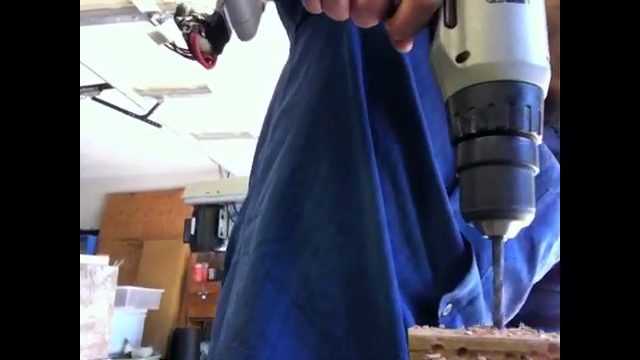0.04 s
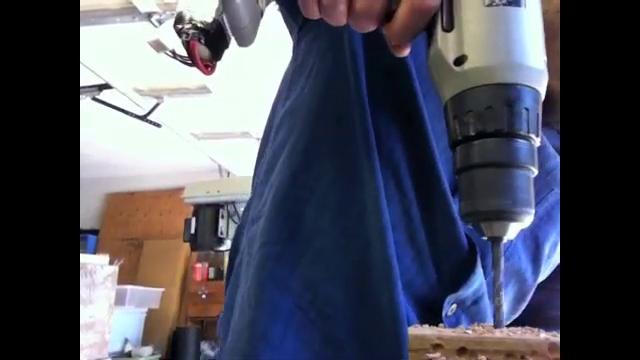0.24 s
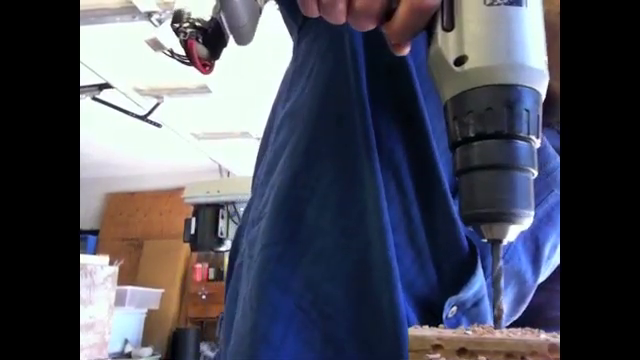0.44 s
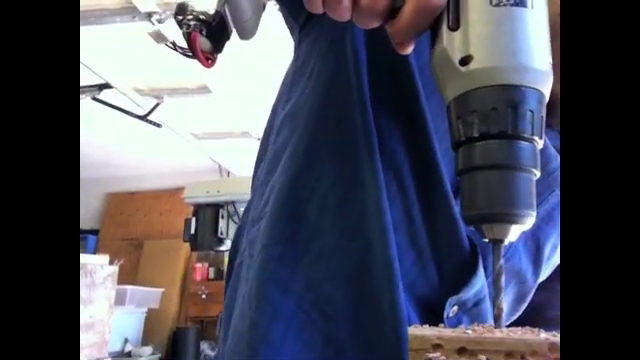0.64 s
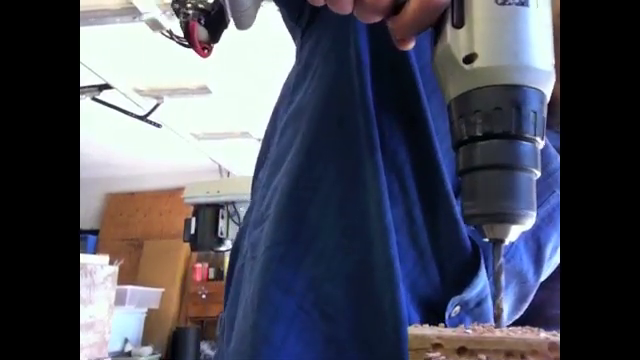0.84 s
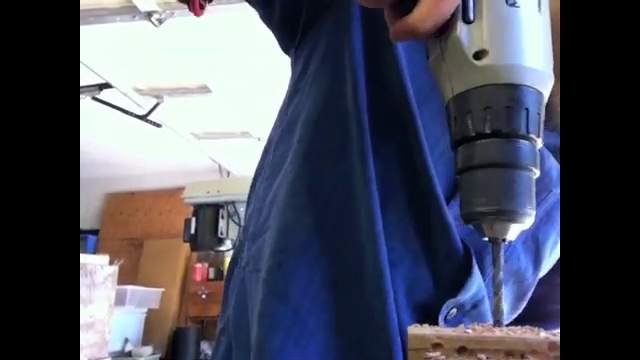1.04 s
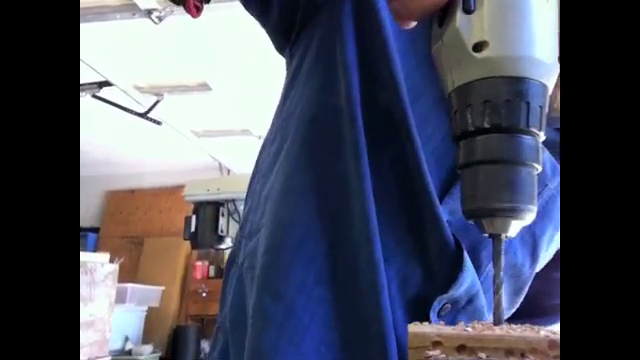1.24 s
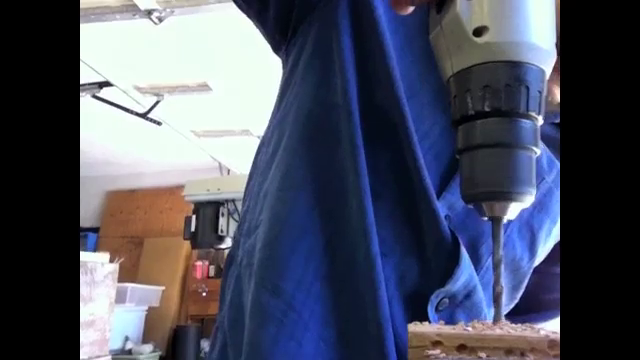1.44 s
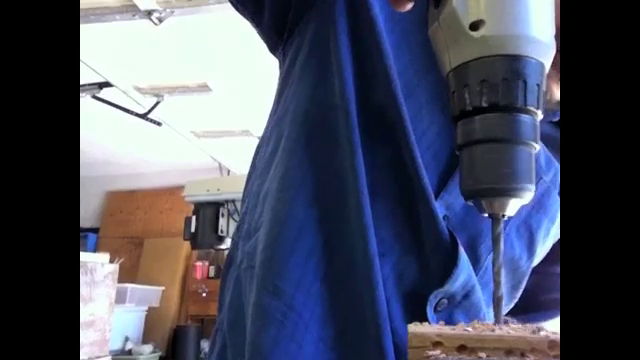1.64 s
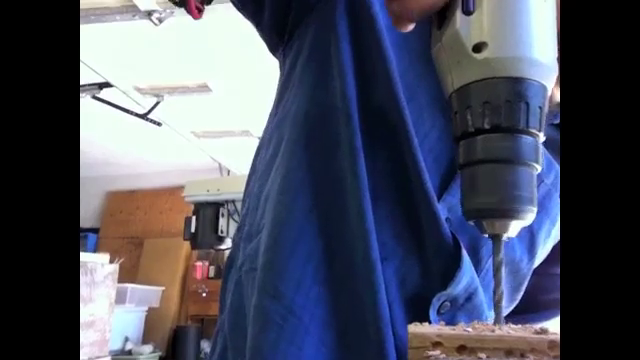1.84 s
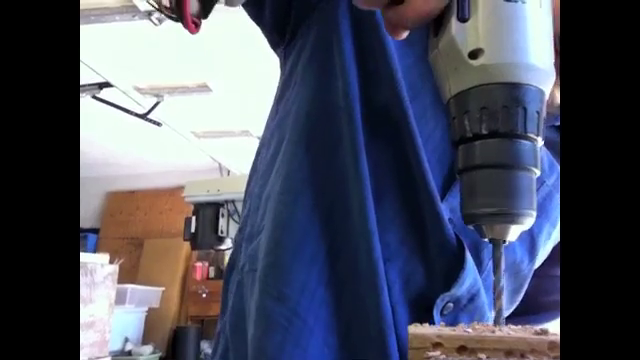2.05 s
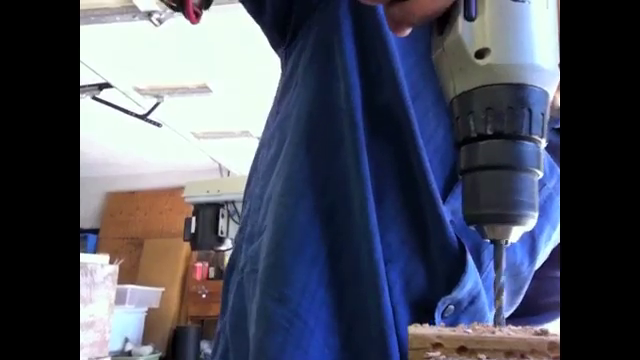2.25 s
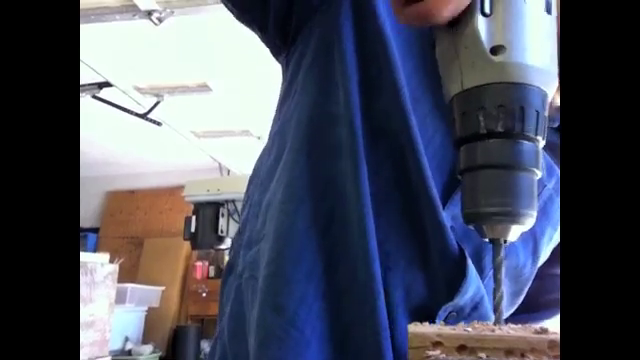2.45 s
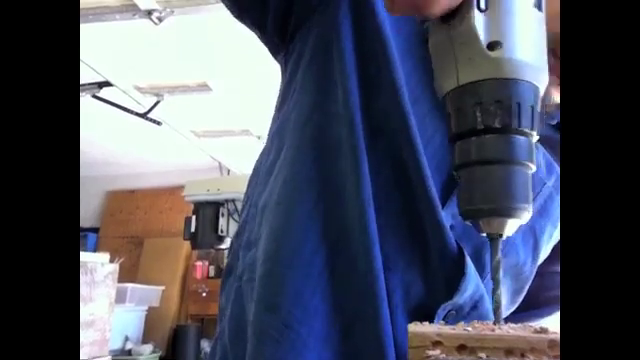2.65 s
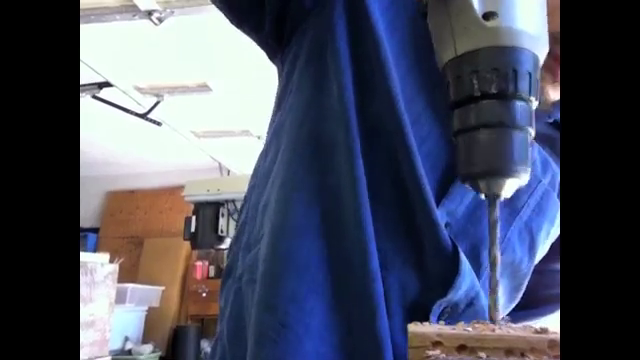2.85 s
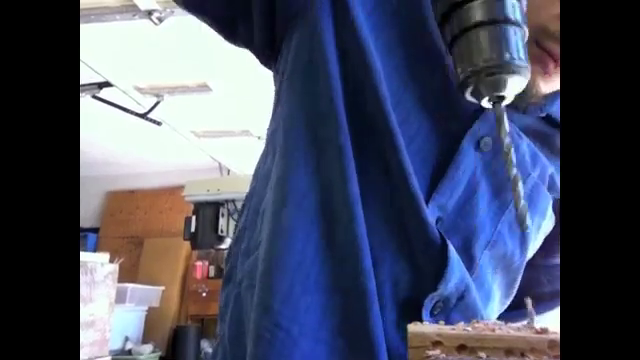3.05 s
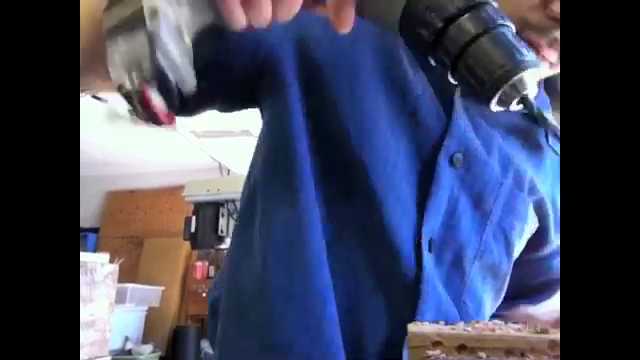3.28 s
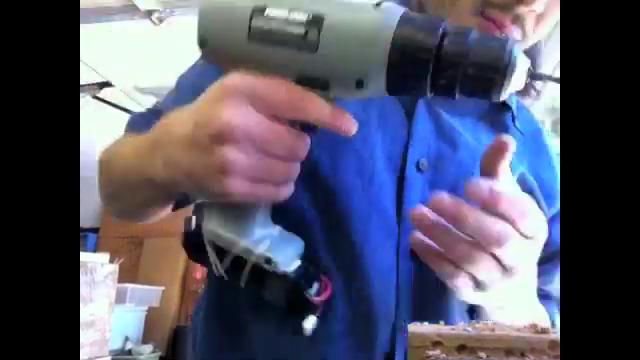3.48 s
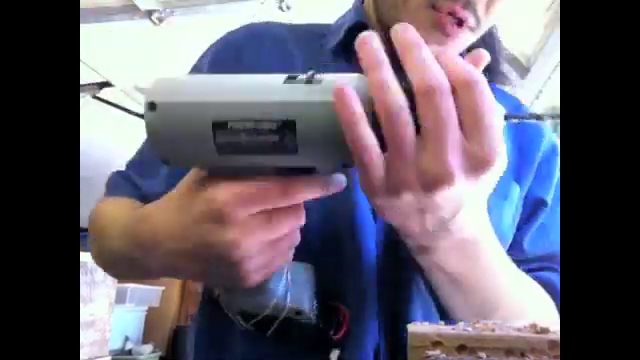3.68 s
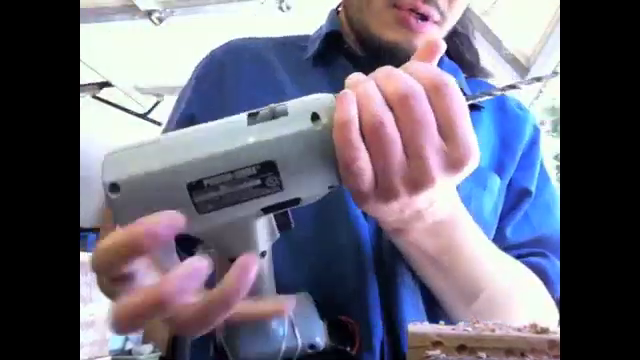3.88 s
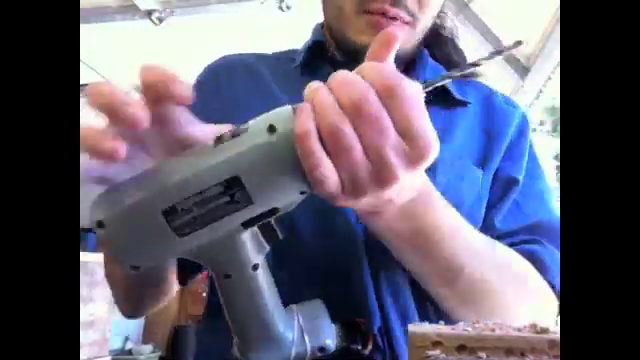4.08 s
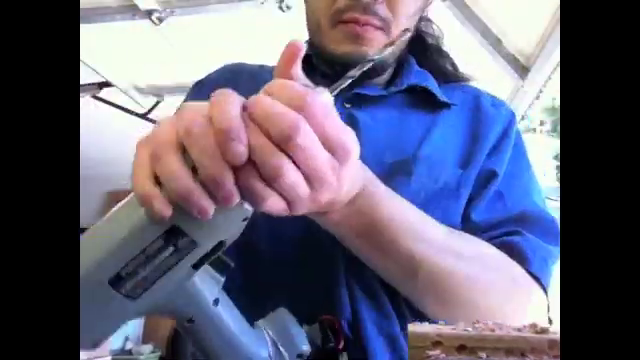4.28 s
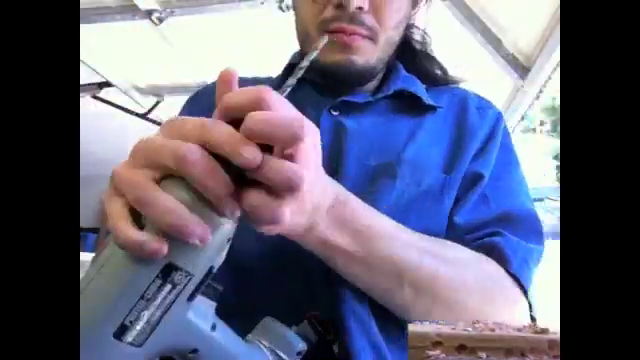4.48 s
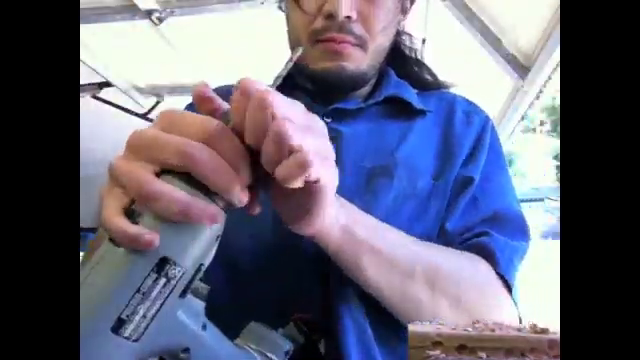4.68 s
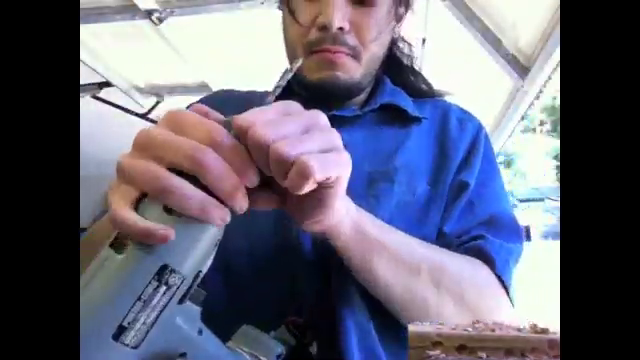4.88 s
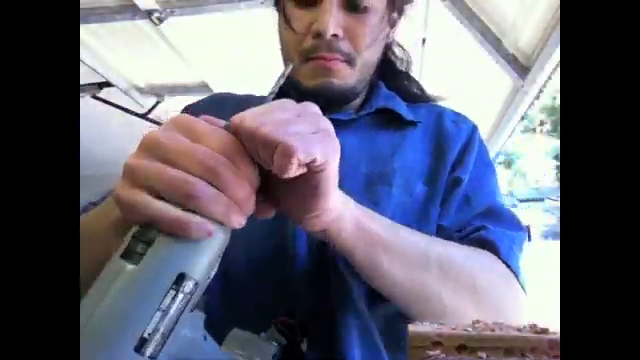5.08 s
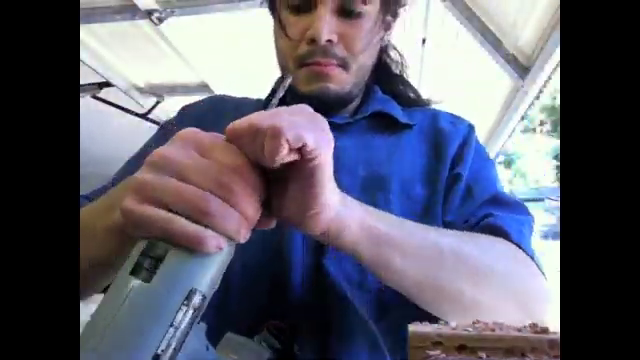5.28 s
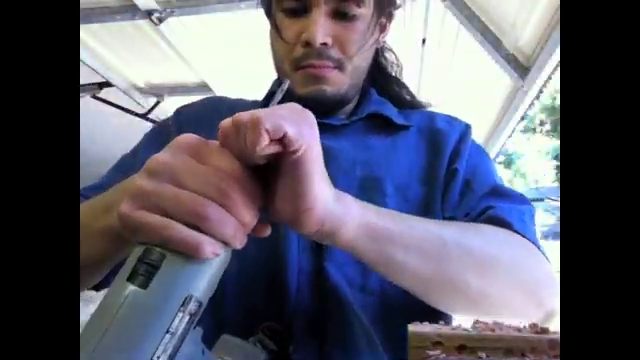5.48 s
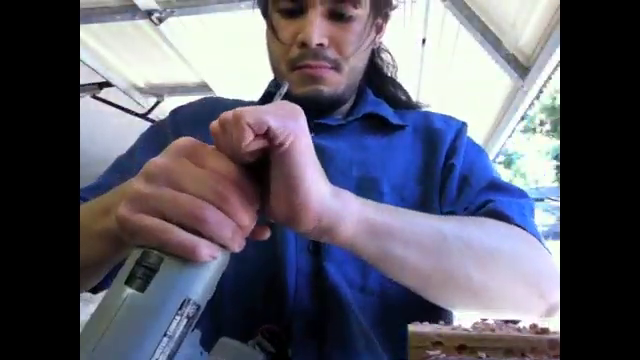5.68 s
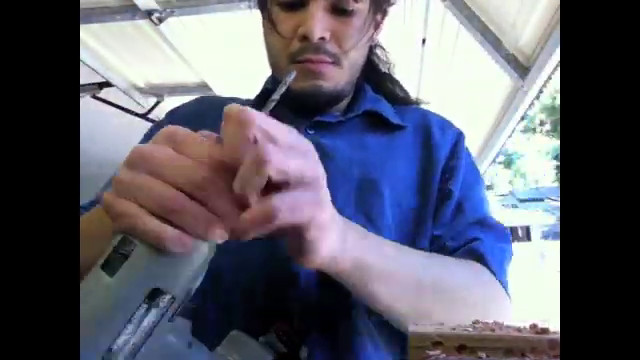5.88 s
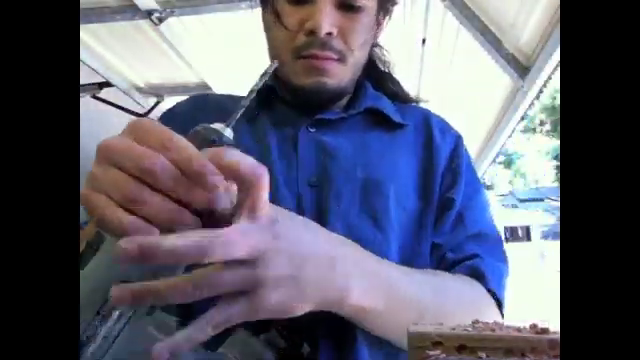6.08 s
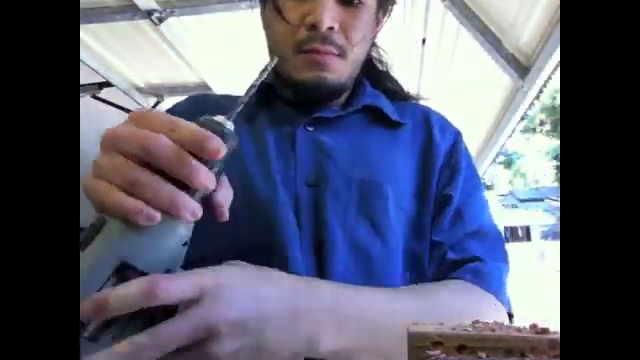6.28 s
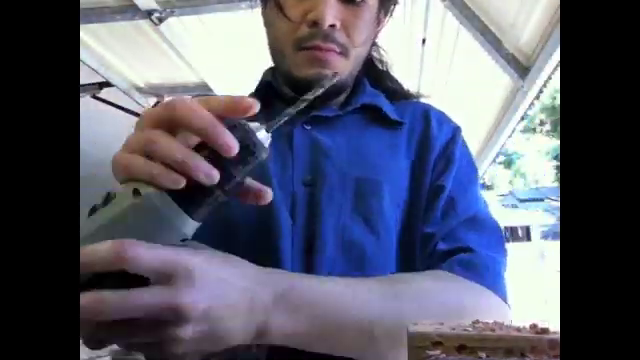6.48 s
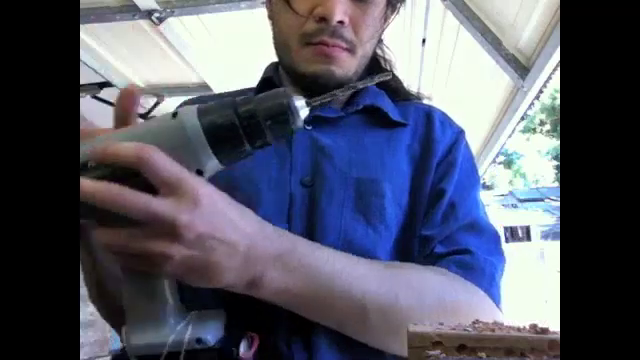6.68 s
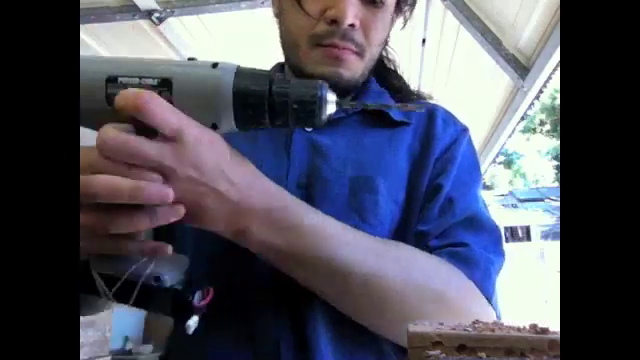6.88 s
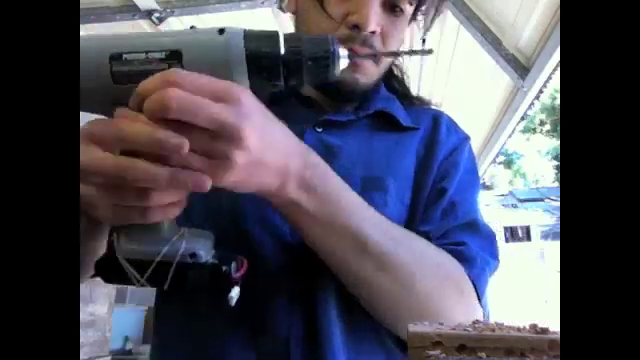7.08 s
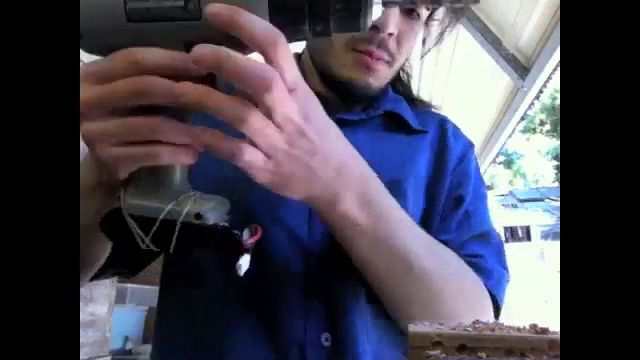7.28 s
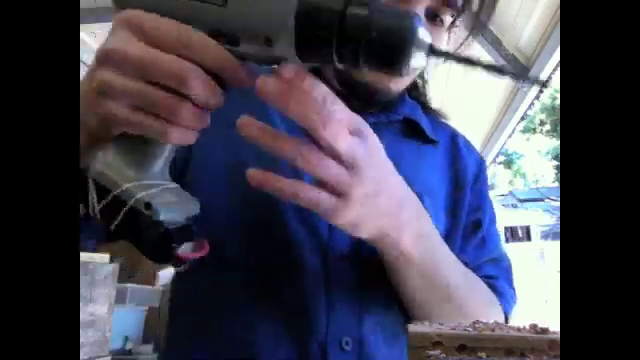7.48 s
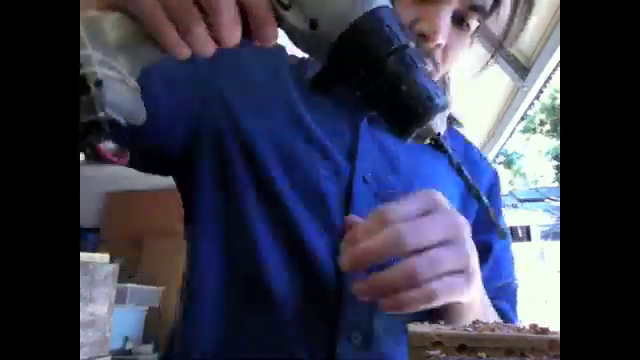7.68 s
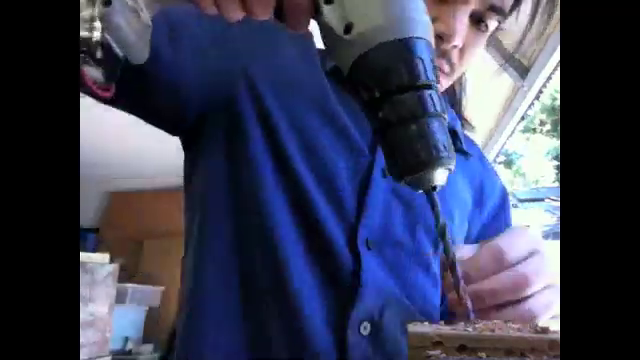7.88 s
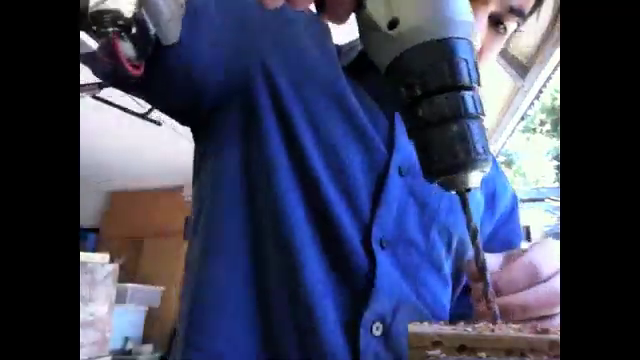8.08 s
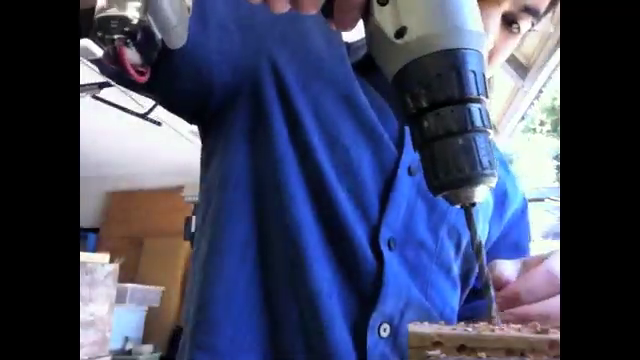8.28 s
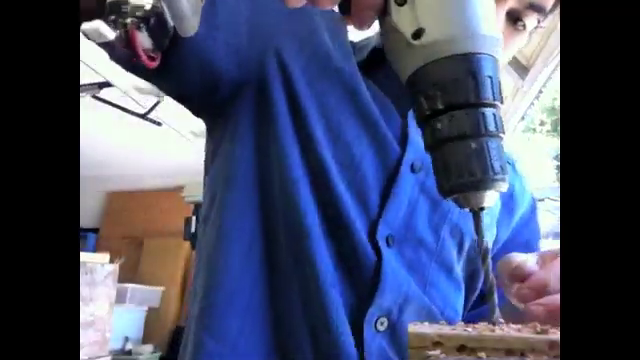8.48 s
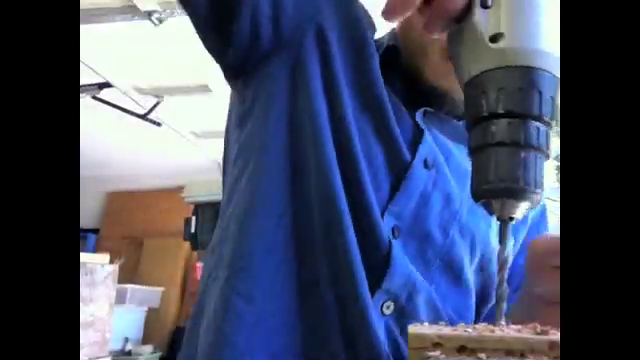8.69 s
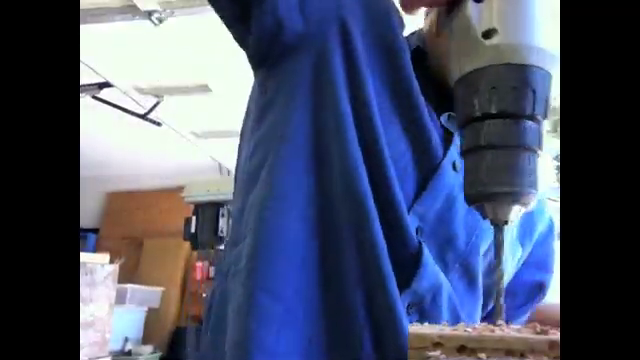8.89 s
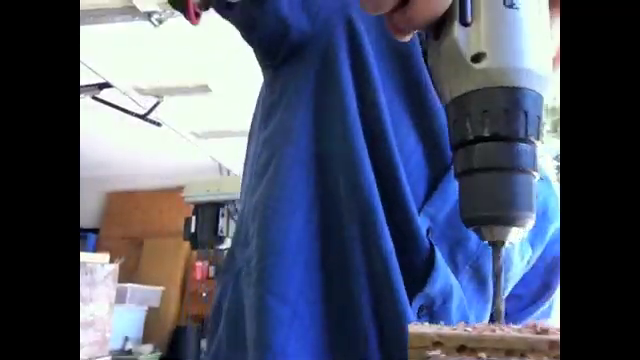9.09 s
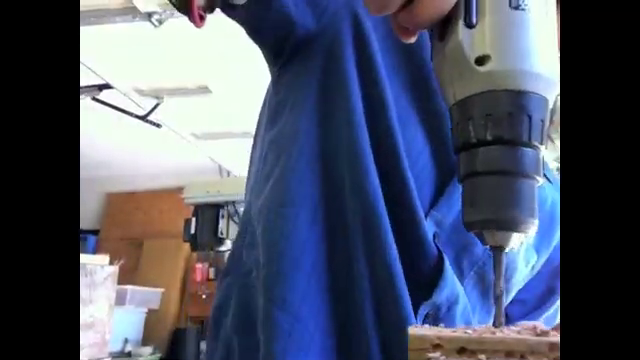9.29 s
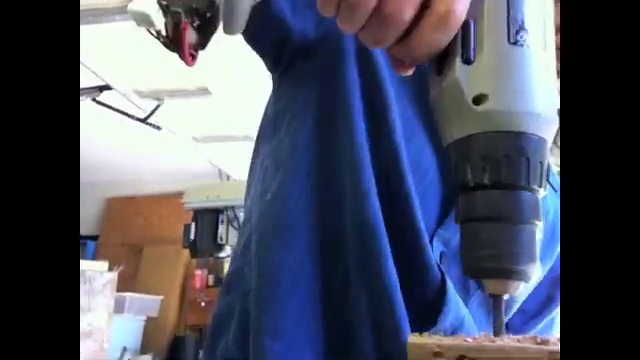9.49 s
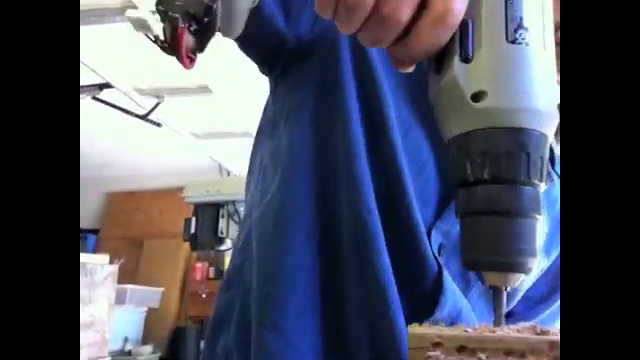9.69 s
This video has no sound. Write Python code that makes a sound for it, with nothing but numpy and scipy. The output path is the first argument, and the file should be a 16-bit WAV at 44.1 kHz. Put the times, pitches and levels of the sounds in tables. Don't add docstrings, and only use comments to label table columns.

```python
import sys
import numpy as np
from scipy import signal
from scipy.fft import rfft, irfft, next_fast_len
from scipy.io import wavfile
from scipy.ndimage import uniform_filter1d

SR = 44100
rng = np.random.default_rng(int(sys.argv[2]) if len(sys.argv) > 2 else 0)


def to_linear_factor(level_db):
    exponent = np.asarray(level_db, float) / 20
    return 10 ** exponent


def master_out(mix):
    frames = np.transpose(np.atleast_2d(mix))
    ceiling = np.clip(frames, -1, 1)
    pcm = np.round(ceiling * 32767).astype(np.int16)
    wavfile.write(sys.argv[1], SR, pcm)


N = 429534
T = np.arange(N) / SR
FULL_SPEED = 178.8
# time_s, speed_turns_per_s, rattle_db
RUNS = [
    [(0, 180.5, -29.5), (.06, 180, -28), (.15, 179, -27.8), (1.01, 178.6, -28.2), (1.058, 151, -32),
     (1.095, 133, -34.5), (1.16, 108, -39.5), (1.22, 85, -44), (1.32, 47, -44)],
    [(1.38, 150, -32.5), (1.43, 177, -32), (1.53, 186, -33), (1.72, 191, -35.5), (1.82, 194, -33),
     (2.0, 187, -31.5), (2.1, 186, -30), (2.22, 177.6, -29.5), (2.47, 177, -30.5)],
    [(2.54, 150, -30), (2.62, 125, -40.5), (2.78, 96, -41), (2.84, 85, -45.5), (3.34, 21, -61.5),
     (3.45, 4.7, -74), (3.65, 5, -110)],
    [(8.962, 5.1, -110), (8.972, 12, -41.5), (8.998, 45.5, -37.5), (9.05, 126, -35), (9.15, 167, -30.5),
     (9.25, 183, -30), (9.32, 187.5, -31), (9.44, 184, -29), (9.57, 177, -33.5), (9.69, 187, -36)],
]
# frequency_hz, density_db per Hz
RATTLE_COLOUR = [(88, -48.5), (150, -17.5), (308, -17.5), (492, -8.5), (990, -8.5), (1380, -3),
                 (1580, -1.5), (2420, 4), (3510, 0), (4880, -5), (6540, -5.5), (7640, -10.5), (15700, -31)]
# frequency_hz, width_hz, level_db
SHELL_MODES = [(1370, 55, -3.5), (2336, 260, -4), (3073, 94, 1.5), (4560, 470, 0.5), (6000, 280, 5),
               (7500, 730, -6)]


def rms_one(x):
    return x / np.sqrt(np.mean(x ** 2) + 1e-20)


def in_time(rows):
    s, *columns = np.transpose(rows)
    return [np.interp(T, s, c) for c in columns]


def drift(rate_hz, where=slice(None)):
    r = np.exp(-64 * np.pi * rate_hz / SR)
    slow = signal.lfilter([1], [1, -2 * r, r * r], rng.standard_normal(N // 32 + 2002))[2000:]
    return np.interp(np.arange(N)[where] / 32, np.arange(len(slow)), rms_one(slow))


def colour(x, points):
    hz, db = np.transpose(points)
    size = next_fast_len(N)
    log_hz = np.log(np.fft.rfftfreq(size, 1 / SR) + 1)
    gain = to_linear_factor(np.interp(log_hz, np.log(hz), db))
    return rms_one(irfft(rfft(x, size) * gain, size)[:N])


def resonate(x, hz, width_hz):
    r = np.exp(-np.pi * width_hz / SR)
    poles = [1, -2 * r * np.cos(2 * np.pi * hz / SR), r * r]
    return signal.lfilter([(1 - r * r) / 2, 0, (r * r - 1) / 2], poles, x)


def cut(x, hz, kind):
    return signal.sosfilt(signal.butter(3, hz, kind, fs=SR, output="sos"), x)


def held(rows, rise, fall):
    levels = [db - rise * np.maximum(s - T, 0) - fall * np.maximum(T - s - hold, 0) for s, hold, db in rows]
    return np.max(levels, axis=0)


def add(out, s, db, wave):
    i = int(s * SR)
    out[i:i + len(wave)] += (to_linear_factor(db) * wave / np.abs(wave).max())[:N - i]
    return out


def dying(noise, t60, rise=0.002):
    t = np.arange(len(noise)) / SR
    return noise * np.minimum(t / rise, 1) * to_linear_factor(-60 * t / t60)


def bursts(rows, clean, flutter_hz):
    out = np.zeros(N)
    flutter = clean + rms_one(cut(rng.standard_normal(N), flutter_hz, "low"))
    for s, hz, db, length in rows:
        near = slice(int((s - .25) * SR), int((s + .25) * SR))
        t = T[near] - s
        out[near] += to_linear_factor(db) * np.exp(-(t / length) ** 2) * np.sin(2 * np.pi * hz * t)
    return out * flutter / np.sqrt(1 + clean ** 2)


def struck(hits, modes, rough):
    out, t = np.zeros(N), np.arange(5000) / SR
    for (s, db), own in zip(hits, rng.standard_normal((len(hits), len(modes), 40))):
        wave = np.zeros(len(t))
        for (hz, mode_db, t60), k in zip(modes, own):
            rattling = rough * np.interp(t, np.arange(38) * .002, k[2:])
            level = to_linear_factor(mode_db + 1.5 * k[0] - 60 * t / t60)
            wave += level * np.sin(2 * np.pi * hz * t + 3 * k[1] + rattling)
        add(out, s - .0003, db, wave * np.minimum(t / .0006, 1))
    return cut(out, 700, "high")


def clicks(rows):
    # frequency_hz, width_hz, level_db
    plastic_modes = [(1770, 890, -4), (2410, 1600, -16.5), (4000, 1700, -12.5), (6120, 590, -15.5)]
    out = np.zeros(N)
    for (s, db, hz, t60, bright_db), noise in zip(rows, rng.standard_normal((len(rows), 6000))):
        crack = dying(noise, t60, rise=.0012)
        shell = sum(to_linear_factor(mode_db) * resonate(crack, f, width) for f, width, mode_db in plastic_modes)
        tick = to_linear_factor(bright_db + 2.5) * cut(crack, 9000, "high")
        add(out, s - .0003, db, tick + cut(2.07 * shell + 1.7 * resonate(crack, hz, 450), 6440, "low"))
    return out


def housing(x):
    return x + sum(to_linear_factor(db) * resonate(x, hz, width) for hz, width, db in SHELL_MODES)


def gear_lines(lines, turns, blur, waver):
    out = np.zeros(N)
    on = np.gradient(turns) > 10 / SR
    for hz, db in lines:
        rate_hz = 8 + blur * hz
        phase = 2 * np.pi * hz / FULL_SPEED * turns[on] + waver * drift(rate_hz, on) + rng.uniform(0, 2 * np.pi)
        out[on] += to_linear_factor(db + 3 + 1.8 * drift(3 * rate_hz, on)) * np.sin(phase)
    return out


def trigger():
    # on_s, off_s, drone_db re rattle, nose_db re rattle
    presses = [
        (-1, 1.03, -11.5, -4.5),
        (1.33, 2.496, -11, -2.5),
        (8.9, 11, -9, 0),
    ]
    slack_s = .1
    on, off, low_db, nose_db = np.transpose(presses)
    run = np.searchsorted(on, T) - 1
    power = uniform_filter1d((T < off[run] + slack_s / 2) * 1., size=int(slack_s * SR))
    low_db = low_db[run] + 8.5 * (1 - power)
    nose_db = nose_db[run] + 4 * (1 - power)
    return power, low_db, nose_db, run > 0, T > on[-1]


def tooth_load(speed, power):
    skip_db = .14 * uniform_filter1d(np.abs(np.gradient(speed)) * SR, size=2000)
    loaded_db = np.maximum(-1.1 * np.abs(speed - FULL_SPEED) - skip_db, -14)
    return skip_db, loaded_db * power - 20.5 * (1 - power)


def tooth_hits(hits, turns, power):
    planets = 1 + 0.063 * np.cos(2 * np.pi * turns / 3) + 0.023 * np.cos(2 * np.pi * turns * 2 / 9)
    rounds = (turns * 55.6 / FULL_SPEED + .0015 * drift(8)) % 1
    worn = hits[:800][(rounds * 800).astype(int)] * .45 * power
    return (hits + worn) * planets * to_linear_factor(1.0 * drift(25))


def drone(rattle, speed, power, low_db, skip_db, load_db, regripped):
    gaining = uniform_filter1d((np.gradient(speed) > 0) * 1., size=2000)
    lag_db = .08 * np.minimum(skip_db, 18) * gaining
    low = rms_one(cut(rattle, 1500, "low")) * to_linear_factor(low_db + 2.0 + power * (0.17 * load_db - lag_db))
    palm = 0.6 * regripped * power * np.clip(load_db / -14, 0, 1)
    return low - palm * resonate(low, 1010, 170)


def nose_ring(teeth, nose_db, power):
    # frequency_hz, width_hz, level_db
    nose_modes = [(3780, 268.5, 4.5), (4150, 340, -9), (3740, 54, 2.5)]
    # frequency_hz, width_hz, level_db re rattle
    slack_modes = [(754, 39, -19.5), (1410, 60, -12), (1770, 36, -17), (2375, 70, -16), (4500, 67, -19.5),
                   (2960, 900, -12)]
    nose = rms_one(sum(to_linear_factor(db) * resonate(teeth, hz, width) for hz, width, db in nose_modes))
    nose = nose * to_linear_factor(2 * (nose_db + 5.5) - 17.5)
    slack = sum(to_linear_factor(db) * rms_one(resonate(teeth, hz, width)) for hz, width, db in slack_modes)
    return nose + (1 - power) * slack


def fan_and_brushes(hits, turns, rattle_db, power):
    fan_db = -19.5 + 0.096 * np.clip(-30.5 - rattle_db, 0, 30) * (1 - power)
    shaft = 1 + 0.11 * np.cos(2 * np.pi * turns)
    fan = cut(colour(hits[::-1] * shaft, RATTLE_COLOUR), 7350, "high") * to_linear_factor(fan_db + 25.0)
    brush = rms_one(cut(hits, [10000, 14000], "band")) * (1 - power)
    return fan + brush * to_linear_factor(-35 + .95 * np.clip(-28.5 - rattle_db, 0, 24))


def gear_mesh(turns, speed, load_db, regripped, in_wood):
    # frequency_hz at full speed, level_db
    chuck_lines = [(560, -61), (1340, -52)]
    # frequency_hz at full speed, level_db
    mesh_lines = [(382, -64), (500.6, -56.5), (608, -59), (775, -58), (893.6, -56), (996, -63),
                  (1109, -51.5), (1170, -57), (1443, -51.5), (1776, -53), (1949, -53), (2294, -54),
                  (2324, -56), (2443, -50), (2503, -46.5), (2692, -54), (2821, -55), (3338, -55),
                  (3978, -56), (4280, -58), (4404, -52), (4838, -46.5), (5010, -52), (5184, -54),
                  (5378, -57), (5550, -58), (5981, -55), (6648, -59), (7537, -54), (7581, -48), (7714, -53)]
    # low_hz, high_hz, beats_per_turn, depth (0-1)
    throb_bands = [(0, 2000, .195, .35), (2000, 3000, 1 / 3, .4), (3000, 9000, 1, .3)]
    # frequency_hz, width_hz, share added
    grip_changes = [(1380, 200, .7), (2460, 260, -.85), (4960, 80, .8)]
    slow = gear_lines(chuck_lines, turns, blur=.002, waver=.7)
    slow = slow * (speed / FULL_SPEED) ** 6 * to_linear_factor(-.08 * load_db)
    mesh = np.zeros(N)
    for low_hz, high_hz, beats, depth in throb_bands:
        band = [line for line in mesh_lines if low_hz < line[0] < high_hz]
        throb = 1 + depth * np.cos(2 * np.pi * beats * turns)
        mesh += gear_lines(band, turns, blur=.003, waver=1.1) * throb
    mesh = mesh * to_linear_factor(load_db - 6 * in_wood)
    mesh = mesh + regripped * sum(share * resonate(mesh, hz, width) for hz, width, share in grip_changes)
    return (slow + mesh) * to_linear_factor(33)


def loose_gears(turns):
    # frequency_hz at full speed, level_db
    pinion_lines = [(4790, -6), (4500, -7)]
    # start_s, hold_s, level_db
    flank_changes = [
        (1.035, 0.029, -33),
        (2.2, 0.26, -42),
        (2.47, 0.064, -37),
        (9.05, .12, -45),
    ]
    # frequency_hz at full speed, level_db
    loose_lines = [(1672, -4), (2234, 0)]
    # start_s, hold_s, level_db
    sing_times = [
        (-.1, 1.09, -51),
        (1.41, .14, -43.5),
        (1.6, .4, -58),
        (2.03, .27, -47),
        (9.08, .2, -51),
        (9.26, .19, -41.5),
        (9.5, .3, -46),
    ]
    # frequency_hz at full speed, level_db
    growl_lines = [(893.6, -7), (1170, -9), (1425, 0)]
    # start_s, hold_s, level_db
    growl_times = [
        (1.39, 0.12, -49),
        (9.07, 0.22, -51),
    ]
    coast = to_linear_factor(held(flank_changes, 710, 510)) * gear_lines(pinion_lines, turns, blur=0.014, waver=1.5)
    coast = coast + 1.3 * resonate(coast, 4050, 500)
    sing = to_linear_factor(held(sing_times, 300, 260)) * gear_lines(loose_lines, turns, blur=0.006, waver=1.3)
    growl = to_linear_factor(held(growl_times, 300, 100)) * gear_lines(growl_lines, turns, blur=.003, waver=.8)
    return coast + sing + growl


def drill():
    # start_s, hold_s, dulled_share_db
    stall_times = [
        (1.265, .068, -1.5),
    ]
    speed, rattle_db = in_time(sum(RUNS, []))
    turns = np.cumsum(speed) / SR
    power, low_db, nose_db, regripped, in_wood = trigger()
    skip_db, load_db = tooth_load(speed, power)
    hits = rng.standard_normal(N) * to_linear_factor(2.18 * np.minimum(rng.exponential(1, N), 6))
    teeth = tooth_hits(hits, turns, power)
    rattle = housing(colour(teeth, RATTLE_COLOUR))
    body = drone(rattle, speed, power, low_db, skip_db, load_db, regripped)
    body = body + rms_one(cut(rattle, [1500, 6500], "band")) * to_linear_factor(-5.5)
    body = body + nose_ring(teeth, nose_db, power)
    body = body + fan_and_brushes(hits, turns, rattle_db, power)
    body = body + gear_mesh(turns, speed, load_db, regripped, in_wood)
    body = body - to_linear_factor(held(stall_times, 400, 600)) * resonate(body, 8190, 8000)
    return cut(to_linear_factor(rattle_db) * body + loose_gears(turns), 40, "high")


def air():
    # frequency_hz, density_db per Hz
    air_colour = [(74, -28), (125, -3.5), (220, -7.5), (275, -11), (373, -13), (404, -6.5), (515, -10),
                  (558, -6.5), (683, -11.5), (871, -9.5), (1070, -18), (2250, -27), (3050, -33),
                  (6710, -35), (15700, -38)]
    level = to_linear_factor(-63 + .6 * drift(1.7))
    return cut(level * colour(rng.standard_normal(N), air_colour), 95, "high")


def rumble():
    # start_s, hold_s, level_db
    leans = [
        (9.1, .3, -80),
        (9.5, .04, -61),
    ]
    rumble_db = -91.5
    speed = in_time(sum(RUNS, []))[0]
    low = to_linear_factor(rumble_db) * rms_one(cut(rng.standard_normal(N), 65, "low"))
    return low * (1 + 1.5 * speed / FULL_SPEED + to_linear_factor(held(leans, 150, 80) - rumble_db))


def hum():
    # frequency_hz, level_db
    hum_lines = [(161.5, -82), (215, -81), (288, -82), (404, -76), (570, -83), (856, -85)]
    return sum(to_linear_factor(db + 3 + 3.0 * drift(3)) * np.sin(2 * np.pi * hz * T + 2.5 * drift(2))
               for hz, db in hum_lines)


def rough_chirps():
    # centre_s, frequency_hz, level_db,
    # length_s
    chirp_events = [(1.12, 4500, -38, 0.013), (1.135, 4150, -34.5, 0.027), (1.2, 3900, -40, .015),
                    (1.42, 4500, -32, 0.014), (1.47, 3450, -36, 0.04), (2.59, 4400, -36, 0.028),
                    (8.94, 3840, -49, 0.017), (8.968, 1500, -32, 0.0017), (8.968, 580, -38, 0.0035),
                    (9.06, 3750, -31.5, 0.03), (9.21, 3750, -38, .02), (2.38, 4700, -34, .012),
                    (2.49, 4500, -27, .015), (1.97, 3700, -38, .02), (9.0, 3950, -37, 0.022),
                    (9.13, 4300, -36, .03), (9.17, 2300, -37, .03), (7.155, 1040, -46.5, 0.005),
                    (7.334, 1130, -53, 0.005), (7.04, 1950, -64, .04), (7.06, 1150, -62, .012),
                    (7.497, 1390, -53, 0.0056), (6.6, 840, -58, .005), (6.95, 1100, -67, 0.0037)]
    return bursts(chirp_events, .6, 200)


def snaps():
    # start_s, peak_db, pitch_hz, t60_s, brightness_db
    snap_events = [(1.2965, -41, 6300, 0.013, 1), (3.6924, -33, 5900, 0.035, -14.5),
                   (6.4597, -32.5, 1533, 0.018, -36), (6.4886, -30, 3980, 0.034, -23),
                   (6.5445, -35, 2600, 0.014, -36), (6.5762, -37, 4600, .035, -40.5),
                   (6.9467, -47.5, 1310, 0.055, -22.5), (7.1503, -42, 4810, 0.035, -26),
                   (7.494, -43, 3760, 0.096, -29), (7.5874, -43, 5030, 0.028, -13.5),
                   (8.7632, -42.5, 3780, 0.047, -35), (8.9315, -30, 3700, .022, -2),
                   (8.939, -36, 3700, .02, -10), (8.9645, -30, 3920, 0.015, -20),
                   (8.9678, -13.5, 3960, 0.022, -22)]
    return clicks(snap_events)


def whine():
    # centre_s, frequency_hz, level_db, length_s
    whine_events = [(1.322, 3090, -42, 0.02), (1.53, 3067, -41.5, 0.11), (1.91, 3030, -40, 0.034),
                    (2.05, 3050, -45, .04), (1.8, 580, -50, .2), (2.16, 135, -62, .05),
                    (2.35, 267.3, -55, 0.16), (2.3, 4400, -42, .1), (8.947, 3080, -45, 0.009),
                    (3.0, 1400, -58, .1), (2.32, 4985, -42, .11)]
    return bursts(whine_events, 1.8, 40)


def squeals():
    # centre_s, frequency_hz, level_db, length_s
    short_squeals = [(1.4745, 11460, -14.5, 0.0025), (1.48, 11330, -30, 0.0032), (1.97, 11800, -41, .005),
                     (2.08, 8900, -33.5, 0.0042), (9.259, 9280, -26, 0.0017), (9.2885, 13420, -24, 0.002),
                     (9.324, 13310, -27, .003), (9.339, 13350, -40, .005), (9.385, 13300, -37, .004),
                     (9.396, 13210, -18, 0.0027), (9.403, 13200, -31, .002), (9.412, 13320, -35, .004),
                     (9.609, 6800, -19.5, 0.003), (9.639, 6770, -24.5, 0.0066), (9.649, 6700, -23, .002),
                     (9.697, 6980, -18.5, 0.0046), (9.733, 6820, -15.5, 0.003)]
    # time_s, frequency_hz, level_db
    long_squeals = [
        [(9.291, 9060, -45), (9.294, 9090, -17), (9.297, 9080, -15), (9.299, 9030, -19), (9.301, 9050, -15),
         (9.304, 8960, -21), (9.308, 9100, -33), (9.312, 8880, -26), (9.32, 8950, -42)],
        [(9.326, 9300, -42), (9.331, 9500, -21), (9.335, 9350, -32), (9.339, 9340, -29), (9.345, 9320, -33),
         (9.35, 9300, -48)],
        [(9.362, 9230, -42), (9.365, 9230, -19), (9.368, 9300, -18), (9.371, 9450, -11), (9.375, 9460, -11.5),
         (9.3795, 9400, -5), (9.3825, 9450, -25), (9.387, 9400, -20), (9.393, 9480, -33)],
        [(9.3931, 9450, -33), (9.397, 9440, -26), (9.399, 9420, -31), (9.403, 9760, -21), (9.405, 9730, -28),
         (9.407, 9780, -25), (9.412, 9500, -33), (9.42, 9500, -45)],
    ]
    out = np.zeros(N)
    for rows in long_squeals:
        s, hz, db = np.transpose(rows)
        near = (T >= s[0]) & (T < s[-1])
        level_db = uniform_filter1d(np.interp(T[near], s, db), size=50)
        phase = 2 * np.pi * np.cumsum(np.interp(T[near], s, hz)) / SR
        out[near] += to_linear_factor(level_db) * np.sin(phase)
    return out + bursts(short_squeals, 7, 500)


def vent_swing():
    # centre_s, frequency_hz, level_db, length_s
    vent_events = [
        (3.1, 12300, -57.5, .13),
    ]
    return bursts(vent_events, .05, 1800)


def grips():
    # start_s, hold_s, level_db
    grip_events = [
        (3.3, 0.082, -65.5),
        (3.86, 0.1, -62.5),
        (4.65, .05, -65.5),
        (4.9, 1.53, -73),
        (6.89, 0.58, -66.5),
        (8.9, 0.036, -71.5),
    ]
    # frequency_hz, density_db per Hz
    rustle_colour = [(300, -60), (800, -18.5), (1500, 8.5), (2200, 1), (4000, 1), (8000, 0), (15000, -15)]
    grains = rng.standard_normal(N) * to_linear_factor(2 * rng.exponential(1, N) + 1 * drift(29.4))
    return to_linear_factor(held(grip_events, 39.7, 20.5) - 6) * colour(grains, rustle_colour)


def switch():
    # start_s, peak_db
    switch_hits = [
        (3.6922, -27.5),
    ]
    # frequency_hz, level_db, t60_s
    switch_modes = [(1050, -9, .02), (2010, -6, .018), (3980, -3, .022), (4720, -2, .028), (5450, -7, .018),
                    (6130, -4, .014), (7200, -9, .012)]
    return struck(switch_hits, switch_modes, 1.5)


def touches():
    # start_s, peak_db, pitch_hz
    touch_events = [(3.775, -53, 4490), (3.836, -55, 1770), (3.8514, -47.5, 4120), (3.8957, -57, 1840),
                    (3.929, -52.5, 5190), (3.978, -48.5, 1810), (4.168, -55, 5230), (4.347, -58, 4900),
                    (4.527, -50.5, 5200), (4.5558, -54, 1740), (4.6504, -56, 2580), (5.051, -57.5, 2190),
                    (5.277, -61, 2150), (5.8442, -60, 1740), (5.938, -57, 2280), (6.024, -56, 2140),
                    (6.4046, -51.5, 4000), (6.875, -60, 1790), (7.0405, -53, 1910), (7.2366, -60, 1770),
                    (7.3307, -57, 1150), (7.4158, -58.5, 1300), (7.4386, -52, 3930), (7.462, -55, 5920),
                    (7.623, -57, 1480), (8.3625, -60, 1950), (8.5303, -51, 1370), (8.7464, -52.5, 2660),
                    (8.851, -62, 1330), (8.867, -60, 1490)]
    return clicks([(s, db, hz, 0.055, -14.5) for s, db, hz in touch_events])


def scrapes():
    # centre_s, frequency_hz, level_db, length_s
    scrape_events = [
        (3.87, 4120, -69, 0.027),
        (3.95, 4320, -76, 0.033),
        (4.2, 4150, -74, 0.021),
        (6.93, 4500, -72.5, 0.024),
        (7.05, 1820, -63.5, 0.05),
        (7.46, 5300, -67.5, 0.029),
        (8.77, 3620, -60, 0.0093),
    ]
    return bursts(scrape_events, .05, 460)


def slides():
    # start_s, length_s, level_db, low_hz, high_hz
    palm_slides = [
        (4.0, 0.055, -75, 3600, 5500),
        (4.056, 0.031, -65.5, 3800, 8000),
        (4.166, .06, -70.5, 3800, 7500),
        (4.37, .05, -73, 5000, 9000),
        (7.238, 0.032, -70, 4000, 12000),
    ]
    out = np.zeros(N)
    for (s, length, db, low_hz, high_hz), noise in zip(palm_slides, rng.standard_normal((len(palm_slides), 4000))):
        i, n = int(s * SR), int(length * SR)
        friction = rms_one(cut(noise, [low_hz, high_hz], "band"))[-n:]
        out[i:i + n] += to_linear_factor(db) * friction * signal.windows.tukey(n, .2)
    return out


def detents():
    # start_s, peak_db
    detent_hits = [
        (6.4597, -30.5),
        (6.4888, -24.5),
        (6.4915, -21.5),
        (6.504, -52),
        (6.5445, -33),
        (6.5762, -32),
    ]
    # frequency_hz, level_db, t60_s
    collar_modes = [(1580, 0, .024), (2600, 0, .022), (3420, -5, .02), (4060, -2, .022), (4800, -6, .025),
                    (5700, -6, .018), (6550, -6, .018), (7400, -9, .018), (8600, -13, .014),
                    (10200, -17, .012)]
    return struck(detent_hits, collar_modes, 2.4)


def jaws():
    # start_s, peak_db
    jaw_hits = [
        (9.4328, -17),
        (9.4868, -12.5),
        (9.5142, -9.5),
    ]
    # frequency_hz, level_db, t60_s
    jaw_modes = [(1060, -8, 0.022), (2230, -2.5, 0.019), (2980, -17, .025), (3550, -4, 0.023),
                 (4660, -6, 0.028), (5500, -6, .025), (6120, -11, .025), (6800, -4, 0.041)]
    return struck(jaw_hits, jaw_modes, 1.7)


def knocks():
    # start_s, peak_db, thump_db re peak, t60_s
    blows = [
        (9.4331, -13, -30, 0.074),
        (9.4865, -11.5, -19, 0.05),
        (9.5139, -6, -20, 0.043),
    ]
    out = np.zeros(N)
    for (s, db, thump_db, t60), noise in zip(blows, rng.standard_normal((len(blows), 12000))):
        crack = dying(noise, t60, rise=.0001) + 1.5 * dying(noise, .012, rise=.0001)
        steel = cut(crack, [2200, 6500], "band") + 0.8 * cut(crack, [6800, 10500], "band")
        steel = steel + 0.3 * cut(crack, 10500, "high")
        wood = resonate(dying(noise, 0.04), 583, 160)
        thump = cut(resonate(dying(noise[::-1], 0.051), 117.0, 62.0), [132, 500], "band")
        bench = resonate(dying(noise[::-1], 0.035), 240.0, 120.0)
        add(out, s, db, housing(steel))
        add(out, s, db - 23, wood)
        add(out, s, db + thump_db - 3.0, thump)
        add(out, s, db + thump_db - 13.5, bench)
    return out


def shop(x):
    tail = cut(dying(rng.standard_normal(SR // 2), .24), 8500, "low")
    tail = np.concatenate([np.zeros(300), tail / np.sqrt(np.sum(tail ** 2))])
    return signal.fftconvolve(x, tail)[:N]


def scene():
    near = drill() + rough_chirps() + snaps() + whine() + vent_swing()
    near = near + grips() + switch() + touches() + scrapes() + slides()
    near = near + detents() + jaws() + knocks()
    squeal = squeals()
    walls = to_linear_factor(-16) * shop(near + 0.402 * squeal)
    mono = near + squeal + walls + air() + rumble() + hum()
    return np.array([mono, mono])


def band_limit(x):
    return signal.sosfilt(signal.butter(12, 15870, fs=SR, output="sos"), x)


def record(dry):
    top = signal.cheby2(12, 50, 16450, fs=SR, output="sos")
    mix = signal.sosfilt(top, dry)
    return band_limit(mix)


dry = scene()
out = record(dry)
master_out(out)
```